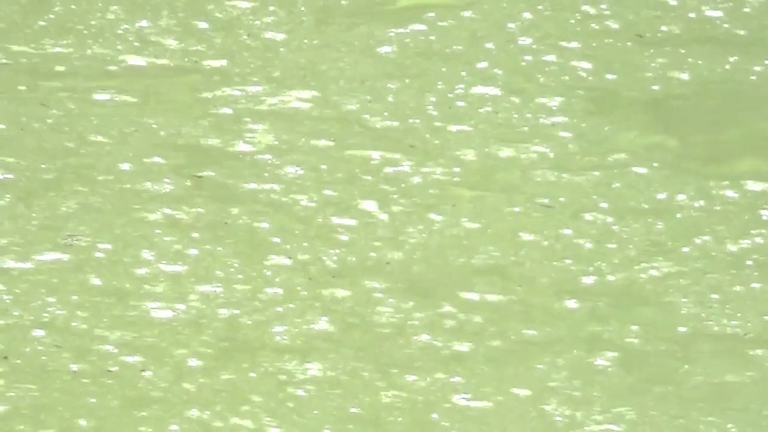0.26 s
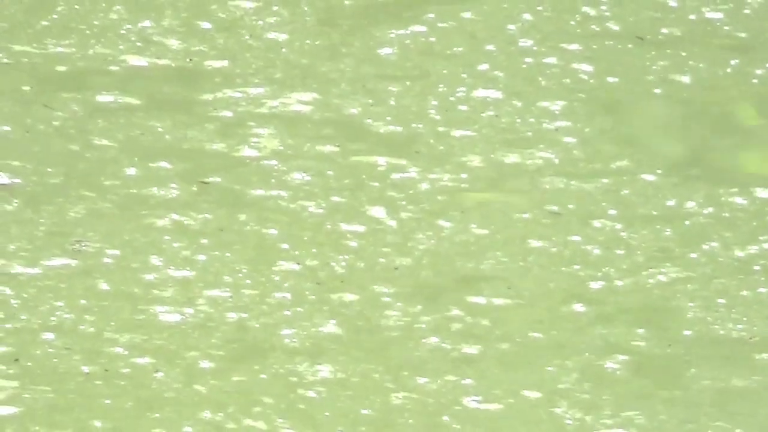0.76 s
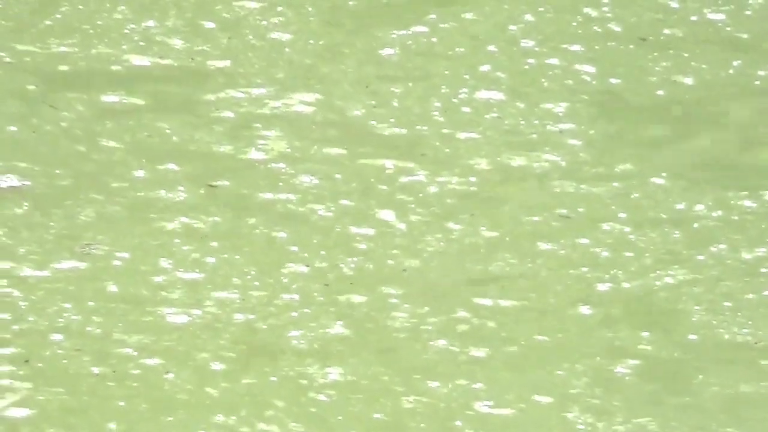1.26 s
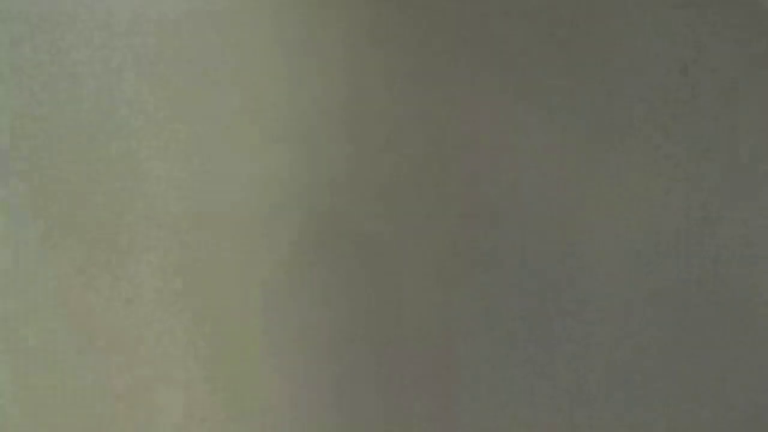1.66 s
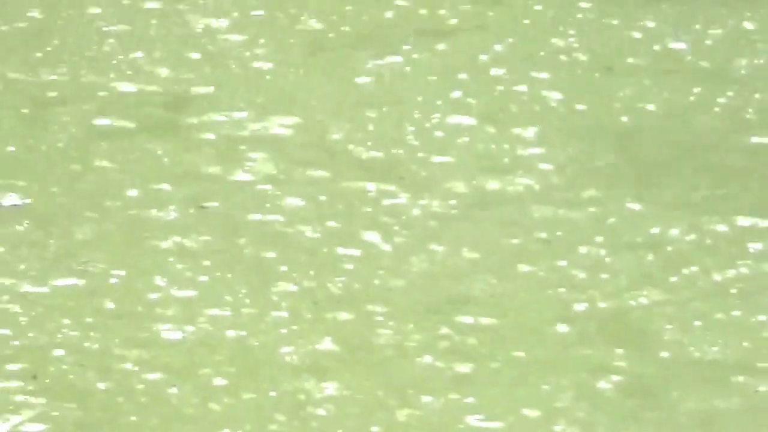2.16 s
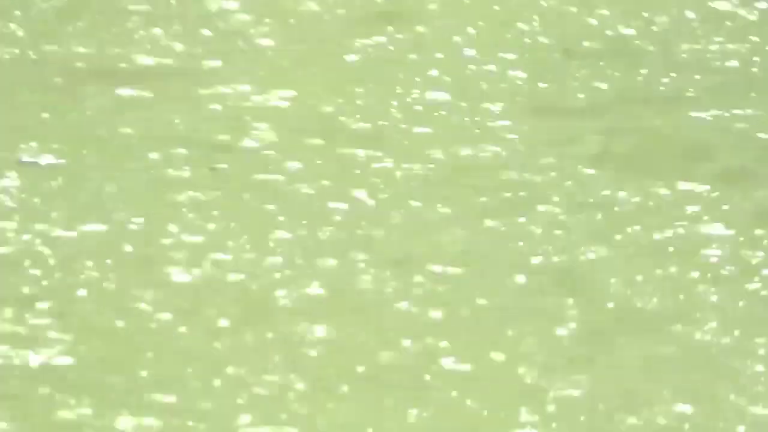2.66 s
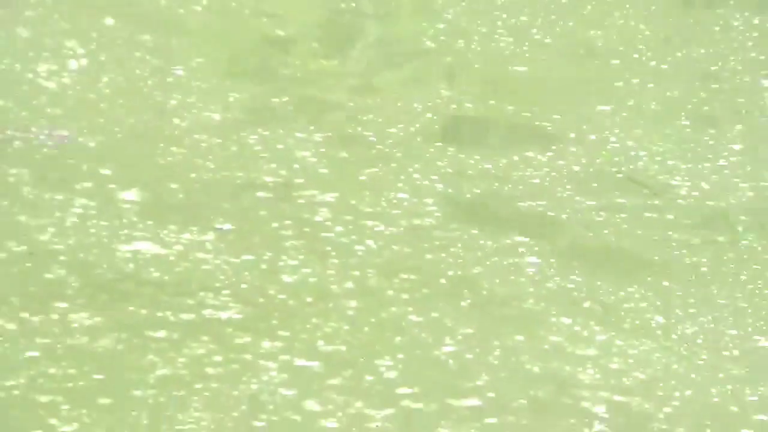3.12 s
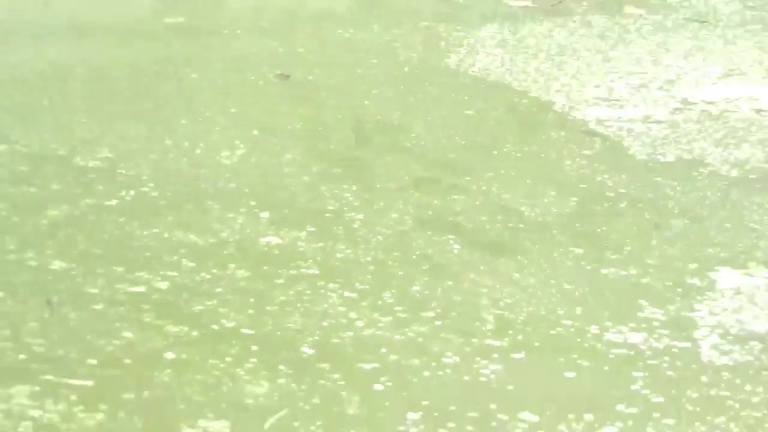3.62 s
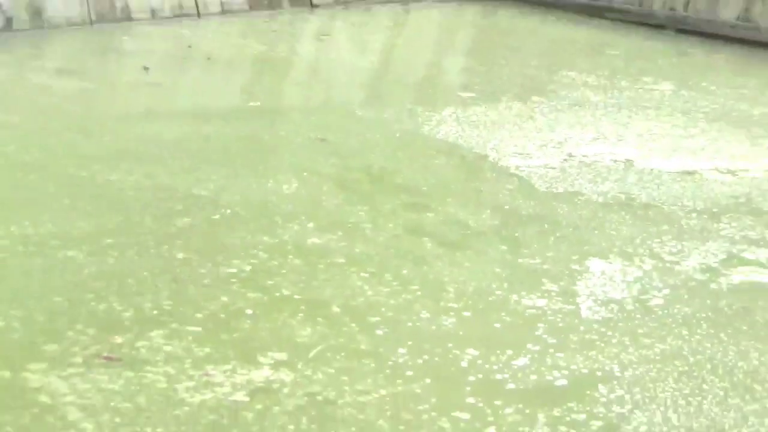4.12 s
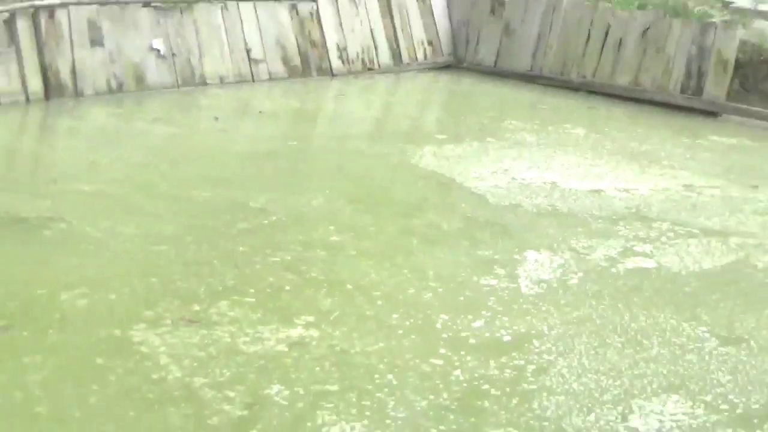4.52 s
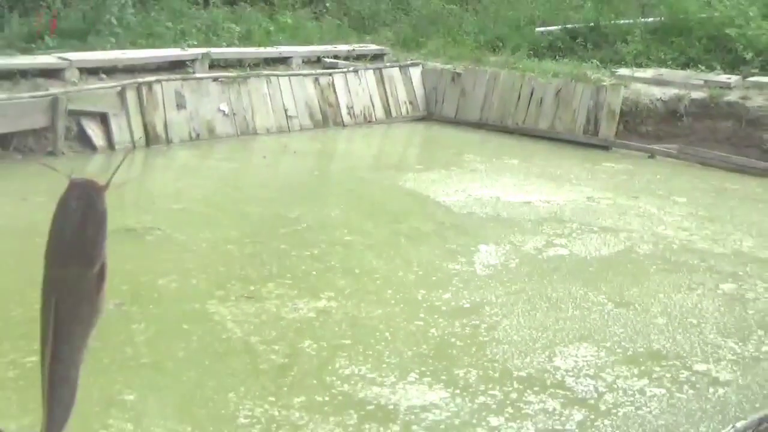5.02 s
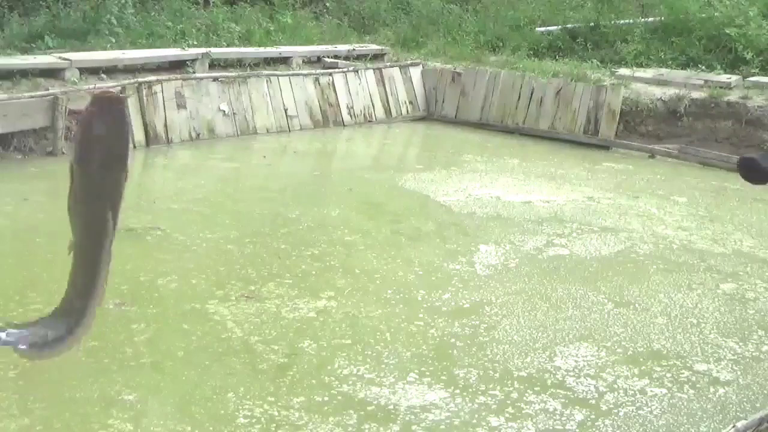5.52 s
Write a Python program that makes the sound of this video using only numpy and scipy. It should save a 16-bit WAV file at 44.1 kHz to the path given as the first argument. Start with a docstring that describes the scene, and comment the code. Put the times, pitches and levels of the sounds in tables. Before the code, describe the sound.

A hand-held camera's stereo microphones catch an open pond: a continuous rattling insect trill and low airy rumble. Handling noise is close and dry: gritty slides first, then a flurry of hollow plastic clicks, creaks and soft low bumps, thinning to scattered taps. Near the end a sharp, hard slap stands far above everything, then small bubbly drips and rubbing. The treble is slightly dulled.

```python
"""Insects chirr steadily around a still pond over a far rumble and a dull murmur, heard by a hand-held camera.
A hand and sleeve slide close by (fine grit), the grip bumps (short low tones), fingers knock and creak on
the plastic shell (clicks and slips ringing its modes) and tackle ticks (tiny bright noise bursts).
One sharp slap falls as the catch is swung in (blows ringing a hollow body, with spray); it drips
in short gliding bubble tones."""
import sys
import numpy as np
from scipy import signal
from scipy.fft import rfft, irfft
from scipy.io import wavfile
from scipy.ndimage import uniform_filter1d

SR = 44100
rng = np.random.default_rng(int(sys.argv[2]) if len(sys.argv) > 2 else 0)


def pcm_store(signal):
    """Save signal as 16-bit PCM."""
    levels = np.round(np.clip(np.atleast_2d(signal), -1, 1) * 32767)
    wavfile.write(sys.argv[1], SR, levels.astype(np.int16).T)


N = 254898

# Resonances of the plastic shell in three ranges. Each row: pitch in Hz, relative level in dB,
# decay time t60 in s before the player's damping factor, left minus right in dB.
SHELL_LOW = [(599, -4, 0.056, 7), (814, 5, 0.061, 2), (851.6, -1.5, 0.08, 0.5), (1032, 3, 0.027, -5.5)]
SHELL_MID = [(1272, -0.32, 0.011, -6.5), (1507, -1.7, 0.025, -3)]
SHELL_HIGH = [(1780, 0, .03, 3), (1960, 0, .025, 5), (2450, -5, .022, 3), (2850, -7, .02, 0),
              (3850, -9, .015, 3)]
SHELL_GROUPS = (SHELL_LOW, SHELL_MID, SHELL_HIGH)
DETUNE = 0.03  # random spread of mode pitch from hit to hit, as a fraction
OPPOSITE = np.array([[1], [-1]])  # opposite polarity left and right


def undb(db):
    """Decibels to gain."""
    return 10 ** (np.asarray(db) / 20)


def unit(x):
    """Scale to rms 1."""
    return x / np.sqrt(np.mean(x ** 2))


def peak(x, db):
    """Scale to a peak level in dB."""
    return x * undb(db) / np.abs(x).max()


def on_bins(table):
    """Read a (Hz, value) table at every spectral bin on a log frequency axis."""
    hz, value = np.transpose(table)
    log_bins = np.log(np.fft.rfftfreq(N, 1 / SR) + 1)
    return np.interp(log_bins, np.log(hz), value, left=value[0], right=value[-1])


def colour(x, table):
    """Shape the spectrum of x by a (Hz, dB) table; rms 1."""
    return unit(irfft(rfft(x) * undb(on_bins(table)), N))


def band(x, lo_hz, hi_hz):
    """Causal band-pass."""
    sos = signal.butter(2, [lo_hz, min(hi_hz, 0.45 * SR)], "band", fs=SR, output="sos")
    return signal.sosfilt(sos, x)


def ring(x, hz, t60):
    """One damped mode, driven by x, that falls 60 dB in t60 seconds."""
    pole = np.exp(2j * np.pi * hz / SR - np.log(1000) / (t60 * SR))
    return signal.lfilter([1], [1, -pole], x + 0j).imag


def walk(rate):
    """Random levels held for 1 / rate seconds and smoothed twice over that time."""
    k = max(int(SR / rate), 1)
    steps = np.repeat(rng.standard_normal(N // k + 1), k)
    return uniform_filter1d(uniform_filter1d(steps, k), k)[:N]


def pan(x, lr_db):
    """Place x between the microphones; lr_db is left minus right."""
    return x * undb(np.array([lr_db / 2 + 0 * x, -lr_db / 2 + 0 * x]))


def add(out, s, x):
    """Mix a short stereo sound in at time s."""
    i = int(s * SR)
    out[:, i:i + x.shape[1]] += x[:, :N - i]


def grit(rate, spread_db):
    """Dense slips of either sign at random moments; the cap keeps any one from standing far out."""
    size_db = spread_db * np.minimum(rng.exponential(size=N), 4)
    happens = rng.random(N) < rate / SR
    return happens * rng.choice([-1, 1], N) * undb(size_db)


def swells(table, levels_db):
    """Gain of each layer over time: every row rises, holds and dies away; powers add."""
    swell_db = 20  # drop one rise before the hold and one fall after it
    t, power = np.arange(N) / SR, 0
    for (s, rise, hold, fall, *_), db in zip(table, levels_db):
        before = (s - t) / max(rise, 0.002)
        after = (t - s - hold) / max(fall, 0.002)
        away = np.maximum(before, after).clip(0)
        power = power + undb(np.array(db)[:, None]) ** 2 * undb(-swell_db * away) ** 2
    return np.sqrt(power)


def shell(push, modes, damp, detune=0):
    """A body's modes, each panned its own way, that radiate little outside their own range."""
    push = band(push, 0.76 * modes[0][0], 2.43 * modes[-1][0])
    out = 0
    for hz, db, t60, lr_db in modes:
        mode_hz = hz * (1 + detune * rng.standard_normal())
        out = out + undb(db) * pan(ring(push, mode_hz, damp * t60), lr_db)
    return out


def insects():
    """Near singers rattle nearly four wing strokes a phrase into the wing's resonance; far ones blur to a trill."""
    # Each row: wing pitch in Hz, width of its sharper resonance in Hz, relative level in dB,
    # share sung in clear phrases from 0 to 1, left minus right in dB.
    singers = [(6510, 93, -61.5, 0, 7), (6846, 68, -49.5, 1, -3), (7280, 31, -52, 0.76, 5),
               (7104, 22, -54, 0.9, -4), (7315, 57, -49.5, 0, 2.5), (7210, 280, -46, 0.53, 1),
               (7530, 95, -47, 0.1, -1), (8220, 190, -56, 0.45, 0), (8300, 84, -56, 0, 6),
               (4690, 400, -58.5, 0, 1.5)]
    chorus_db = -42
    phrase_hz, stroke_hz, strokes_sung = 19.8, 90.9, 3.76  # mean phrase and stroke rates
    phrase_place = np.cumsum(phrase_hz * (1 + 0.01447 * walk(1))) % SR / SR
    strokes = phrase_place * stroke_hz / phrase_hz
    phrase = unit(np.sin(np.pi * strokes) ** 2 * (strokes < strokes_sung))
    out = 0
    for hz, width, db, share, lr_db in singers:
        share = np.clip(share, 0, 1)
        gate = (share * phrase + 1 - share) * undb(1.5 * walk(6))
        t60 = np.log(1000) / (np.pi * width)

        def voice():
            return unit(ring(ring(gate * rng.standard_normal(N), hz, t60), hz, t60 / 3))

        near, far = voice(), voice()
        # echoes from the banks reach the two microphones unlike
        out = out + undb(db) * (pan(near, lr_db) + 0.22 * far * OPPOSITE)
    return unit(out) * undb(chorus_db)


def air():
    """Far rumble and open air: noise alike left and right in the bass, wavering slowly."""
    # Spectrum. Each row: frequency in Hz, relative level in dB per Hz.
    spectrum = [(20, -19), (40, -7.5), (65, 0), (80, 1.5), (95, 2.5), (120, -2), (160, -1.5), (250, -5.5),
                (500, -17.5), (1000, -14), (2000, -13.5), (4000, -16), (6000, -19.5), (9000, -16),
                (11000, -24)]
    # Each row: frequency in Hz, left-right likeness from 0 to 1.
    likeness = [(60, 0.95), (130, 1), (270, 0.75), (570, 0.59), (1200, 0.13), (2500, 0.46), (5400, 0.24),
                (11000, .8)]
    air_db = -47.5  # before the waver
    alike = np.clip(on_bins(likeness), 0, 1)

    def noise(share):
        return irfft(rfft(rng.standard_normal(N)) * np.sqrt(share) * undb(on_bins(spectrum)), N)

    mid, side = noise(1 + alike), noise(1 - alike)
    both = np.array([mid + side, mid - side])
    return unit(both) * undb(air_db + 1.2 * walk(4))


def murmur():
    """A dull murmur of noise at 300-1100 Hz swells and flickers, mostly unlike left and right."""
    # Breakpoints before the flicker. Each row: time in seconds, level of each side's own noise in dB.
    breakpoints = [(0.0, -53), (1.26, -54), (1.54, -46), (1.75, -52.5), (2.54, -51.5), (2.88, -49),
                   (3.0, -53), (4.7, -54), (4.83, -46), (5.23, -51.5), (5.78, -46.5)]
    s, db = np.transpose(breakpoints)
    left, right = (unit(band(rng.standard_normal(N), 293, 1116)) for _ in range(2))
    both = np.array([left + 0.27 * right, right + 0.22 * left])
    level_db = np.interp(np.arange(N) / SR, s, db)
    return both * undb(level_db + 2.0 * walk(6.9))


def slides():
    """Fine grit of weave on skin in three colours; the two microphones hear partly different fibres."""
    # Strokes of cloth and skin. Each row: moment of full level in seconds, rise, hold and fall in
    # seconds, level of the low colour in dB, treble against it in dB.
    rubs = [(0.311, 0.0075, 0.035, 0.032, -35.5, 0), (0.339, 0.027, 0.032, 0.0064, -43.5, 17.5),
            (0.372, .01, .005, 0.16, -53, 4), (0.525, .015, 0.026, 0.096, -42.5, -7),
            (0.683, 0.063, 0.022, 0.23, -45.5, -4), (0.76, .03, 0.015, .03, -61, 10),
            (0.929, 0.022, 0.031, 0.029, -53.5, 8), (1.026, 0.034, 0.029, 0.12, -41.5, -4.5),
            (1.413, 0.16, 0.057, 0.087, -45, -3), (1.536, 0.14, 0.048, 0.094, -32, -11),
            (1.642, 0.026, 0.022, 0.0081, -35, -19), (2.574, .006, 0.052, 0.018, -48, -4),
            (4.729, 0.098, 0.056, 0.11, -48, -3.5), (4.804, 0.0073, 0.035, 0.19, -44, -1),
            (4.975, 0.11, 0.058, .015, -41.5, -6), (5.062, 0.06, 0.028, 0.06, -47.5, -4.5),
            (5.212, 0.048, 0.026, 0.053, -44.5, -3), (5.33, 0.6, .3, 0.36, -55.5, 3.5),
            (5.478, .005, 0.011, 0.017, -44.5, 1.5), (5.695, 0.13, 0.055, .12, -40.5, -12)]
    # The three colours. Each row: frequency in Hz, relative level in dB per Hz.
    low_colour = [(700, -27), (1100, -3), (1350, 4.5), (2000, 6), (3000, 0), (4500, -20)]
    mid_colour = [(2000, -29), (3200, -1), (6000, 1.5), (8500, -9.5)]
    top_colour = [(5000, -23), (7500, 11), (9500, 9), (11500, -13.5)]
    mid_db, mid_share = 1, 0.8  # the middle colour follows the treble part of the way
    levels = [(db, db + mid_db + mid_share * top_db, db + top_db) for *_, db, top_db in rubs]
    low, mid, top = swells(rubs, levels)

    def rub():
        x = grit(9000, 3.6) * undb(1.1 * walk(60))
        return low * colour(x, low_colour) + mid * colour(x, mid_colour) + top * colour(x, top_colour)

    return pan(rub(), -3.5) + 0.21 * rub() * OPPOSITE


def bumps():
    """The grip jolts softly for a few cycles of a low tone with one overtone."""
    # Each row: start in seconds, peak before panning in dB, pitch in Hz.
    jolts = [(0.382, -31.5, 262), (1.972, -31.5, 204), (2.133, -35, 192), (2.367, -34, 443),
             (2.469, -35, 445), (2.708, -31, 173), (3.859, -31.5, 161), (4.28, -35, 156), (4.807, -32, 164)]
    out, t = np.zeros((2, N)), np.arange(3000) / SR
    for s, db, hz in jolts:
        tone = np.sin(2 * np.pi * hz * t) + 0.45 * np.sin(2 * np.pi * 1.56 * hz * t)
        add(out, s, pan(peak(tone * t * np.exp(-t / 0.0029), db), 0.3))
    return out


def knocks():
    """A click that chatters briefly and rebounds once rings the shell; the first touch cracks in the treble."""
    # Each row: start in seconds, peaks of the low, middle and upper modes in dB.
    hits = [(0.53, -41, -29, -32), (1.037, -36, -54, -34), (1.639, -29, -32, -27), (1.86, -39, -48, -27.5),
            (1.966, -47, -26.5, -42), (1.976, -33, -42, -41), (2.005, -45, -30, -34),
            (2.134, -22.5, -46, -18.5), (2.31, -38, -22, -23), (2.441, -21, -16.5, -20.5),
            (2.472, -20.5, -17, -25), (2.53, -57, -32.5, -35.5), (2.675, -47, -33, -26),
            (2.706, -17, -13.5, -12.5), (2.761, -15, -17, -15.5), (2.788, -23.5, -26, -24),
            (2.84, -24.5, -32, -27), (2.854, -25.5, -32, -30), (2.848, -26, -42, -34),
            (2.864, -25.5, -33, -29.5), (2.885, -24.5, -35, -29), (2.963, -33, -40, -30),
            (2.973, -33.5, -50, -46), (2.991, -23.5, -31, -28.5), (3.009, -23.5, -29, -26.5),
            (3.277, -28, -33, -29), (3.388, -29, -31, -26.5), (3.503, -26, -32, -29),
            (3.615, -37, -40, -38), (3.75, -42, -40, -24), (3.793, -32, -20, -19), (3.858, -15, -28, -15.5),
            (3.889, -35, -29.5, -30), (4.19, -44, -50, -52), (4.286, -21, -30, -27),
            (4.809, -26.5, -24, -20.5), (5.027, -46, -23.5, -39), (5.311, -32.5, -26.5, -34),
            (5.44, -36, -50, -33)]
    rebound, rebound_s = 0.29, 0.003005  # second touch: gain against the first, delay
    crack_db = -2  # against the upper modes, before panning
    out, t = np.zeros((2, N)), np.arange(4000) / SR
    for s, *levels in hits:
        chatter = rng.standard_normal(len(t)) * np.exp(-t / 0.0013)
        touch = (t == 0) + 0.22 * chatter
        push = touch + rebound * np.roll(touch, int(rebound_s * SR))
        rings = sum(peak(shell(push, modes, 0.64, DETUNE), db) for db, modes in zip(levels, SHELL_GROUPS))
        crack = peak(band(chatter, 9900, 23400), levels[2] + crack_db)
        add(out, s, rings + pan(crack, -2.7))
    return out


def ticks():
    """Hard small parts of tackle touch: a very short, dry, bright click of noise."""
    # Each row: start in seconds, treble and middle peaks before panning in dB, left minus right in dB.
    clicks = [(0.8692, -17, -21.5, -4), (0.9377, -24, -40, -7), (1.516, -32, -20, -2),
              (1.5504, -25, -19, -2), (1.7, -16, -15.5, 2), (1.734, -27, -27, 0.5), (2.1292, -25, -37, 4),
              (2.759, -18, -18, 7), (3.795, -29, -38, 7), (3.9386, -28, -23, -1), (4.818, -28, -35, 11)]
    out, t = np.zeros((2, N)), np.arange(600) / SR
    for s, top_db, mid_db, lr_db in clicks:
        push = rng.standard_normal(len(t)) * np.exp(-t / 0.00055)
        body = peak(band(band(push, 2400, 8700), 2900, 9800), mid_db)
        treble = peak(band(push, 7300, 9100), top_db)
        add(out, s, pan(treble + body, lr_db))
    return out


def creaks():
    """Stick-slip of fingertips: separate slips let the shell modes ring on, with a little bright grit."""
    # Fingers creeping on the shell. Each row: moment of full level in seconds, rise, hold and fall
    # in seconds, levels of the low, middle and upper modes in dB.
    creeps = [(1.857, 0.0055, 0.02, .01, -40, -37.5, -35.5), (1.876, .012, 0.023, 0.032, -47, -47, -43.5),
              (1.974, 0.0098, 0.0057, 0.033, -36, -37, -38.5), (2.129, 0.0077, 0.02, .04, -37.5, -39, -36),
              (2.148, .02, 0.032, .015, -49, -35.5, -36), (2.335, .02, .03, .02, -50, -36.5, -46),
              (2.365, .02, 0.016, 0.014, -38, -32.5, -35.5), (2.439, 0.011, 0.042, 0.013, -41, -39, -36),
              (2.681, 0.0082, 0.029, 0.032, -41.5, -39.5, -34),
              (2.725, 0.022, 0.032, 0.009, -44, -42, -40.5), (2.837, .004, 0.0089, 0.034, -37, -48, -44)]
    gains = swells(creeps, [row[4:] for row in creeps])
    slips = grit(800, 2.5) * undb(2 * walk(100))
    damping = (0.9, 1.3, 0.45)  # factor on t60 for each range
    rings = sum(gain * unit(shell(slips, modes, damp))
                for gain, modes, damp in zip(gains, SHELL_GROUPS, damping))
    bright = unit(band(slips, 1330, 6400))
    return rings + gains[2] * undb(-7.0) * bright


def slap():
    """Rounded blows of a fraction of a millisecond on a hollow body; each chatters on and throws spray."""
    # The slap, its lead-in and its rattle. Each row: start in seconds, peak in dB, spray peak in dB.
    blows = [(4.9126, -13, -36), (4.9155, -14, -23), (4.9195, -30, -23), (4.924, -19, -11.5),
             (4.9255, 0, -12), (4.9315, -11, -35), (4.939, -18, -40), (4.958, -23, -40)]
    # What it rings. Each row: pitch in Hz before detuning, relative level in dB, t60 in seconds,
    # left minus right in dB.
    body_modes = [(715, -14, 0.085, 4), (884, 0, 0.095, 1), (1310, 10.5, 0.0084, -5),
                  (1480, 10, 0.019, -15), (1770, 2.5, 0.036, 3), (2280, -4.5, 0.031, 19),
                  (2950, -3, 0.032, 2), (4300, -33, .012, -3)]
    out, t = np.zeros((2, N)), np.arange(8000) / SR
    blow = np.sin(np.pi * np.clip(t / 0.00017, 0, 1)) ** 2
    for s, db, spray_db in blows:
        push = blow + 0.2 * rng.standard_normal(len(t)) * np.exp(-t / 0.004)
        fade = np.exp(-t / 0.0028) + 0.08 * np.exp(-t / 0.0092)
        hiss = rng.standard_normal((2, len(t))) * fade
        spray = band(hiss, 2200, 4900) + 1.8 * band(hiss, 8450, 10080)
        add(out, s, peak(shell(push, body_modes, 1.0, DETUNE), db))
        # each side also takes the other's spray; it starts just ahead of the blow
        add(out, s - 0.0008, peak(spray + 2.4 * spray[::-1], spray_db))
    return out


def drips():
    """Each drop off the catch is a short gliding bubble tone, roughened by random noise."""
    # Each row: start in seconds, first and last pitch in Hz, length in seconds, peak before panning in dB.
    drops = [(5.213, 975, 1037, 0.054, -32), (5.215, 1480, 1510, 0.025, -26),
             (5.405, 593, 620, 0.039, -35.5), (5.48, 400, 330, 0.015, -36),
             (5.524, 1084, 596, 0.016, -32.5), (5.526, 620, 480, .03, -36),
             (5.668, 1310, 1380, 0.0095, -31), (5.689, 497, 487, 0.057, -37.5)]
    out = np.zeros((2, N))
    for s, first_hz, last_hz, length, db in drops:
        u = np.linspace(0, 1, int(length * SR))
        glide_hz = first_hz * (last_hz / first_hz) ** u
        tone = np.sin(2 * np.pi * np.cumsum(glide_hz) / SR)
        rough = 0.4 + uniform_filter1d(rng.standard_normal(len(u)), 90) * np.sqrt(90)
        swell = np.sin(np.pi * u ** 0.29)  # quick rise, long fall
        add(out, s, pan(peak(tone * rough * swell, db), -2.2))
    return out


def scene():
    """Everything around the microphones."""
    surroundings = insects() + air() + murmur()
    handling = slides() + bumps() + knocks() + ticks() + creaks()
    return surroundings + handling + slap() + drips()


def record(dry):
    """The camera's converter tops out just under full scale, and the top is cut steeply."""
    top_hz = 11000  # both filter corners sit a little above this
    held = np.clip(dry, -0.95, 0.95)
    gentle = signal.butter(8, 1.07 * top_hz, fs=SR, output="sos")
    steep = signal.cheby2(16, 42, 1.03 * top_hz, fs=SR, output="sos")
    return signal.sosfilt(steep, signal.sosfilt(gentle, held))


dry = scene()
out = record(dry)
pcm_store(out)
```